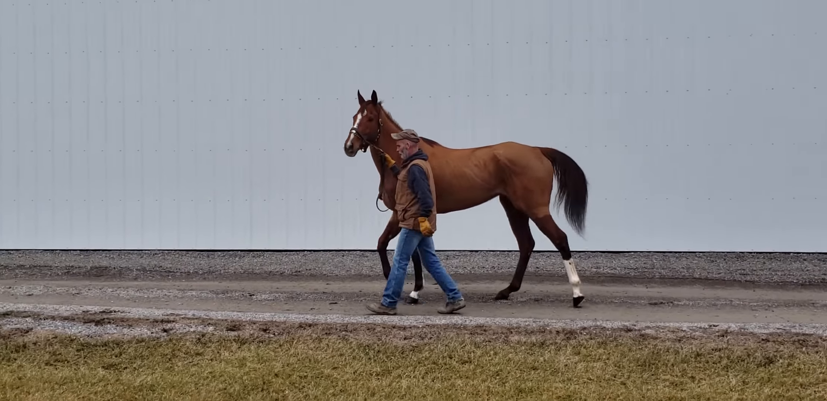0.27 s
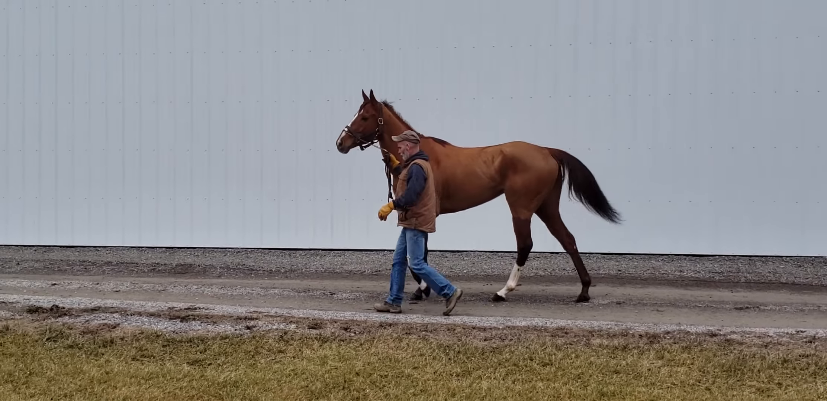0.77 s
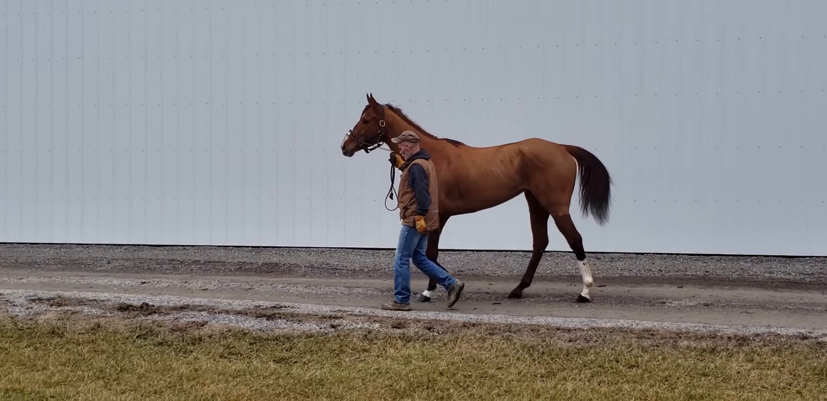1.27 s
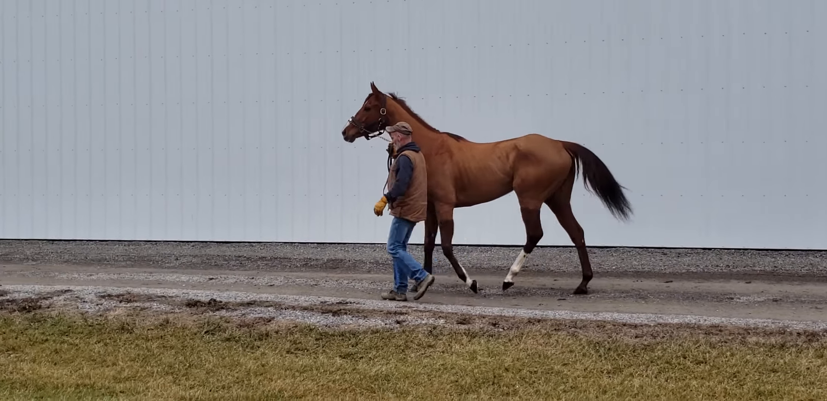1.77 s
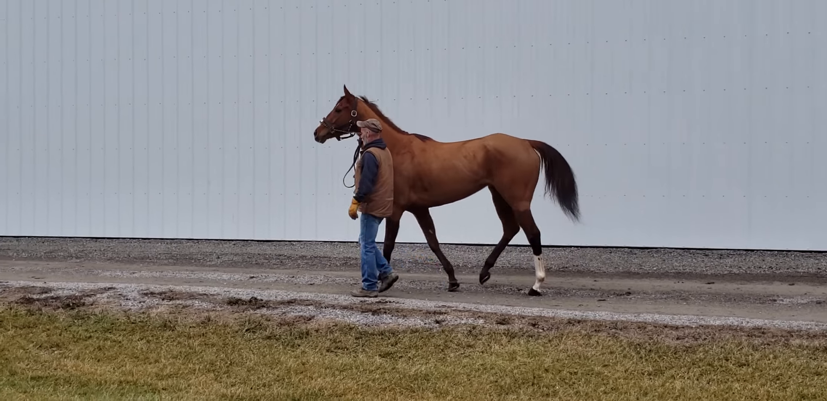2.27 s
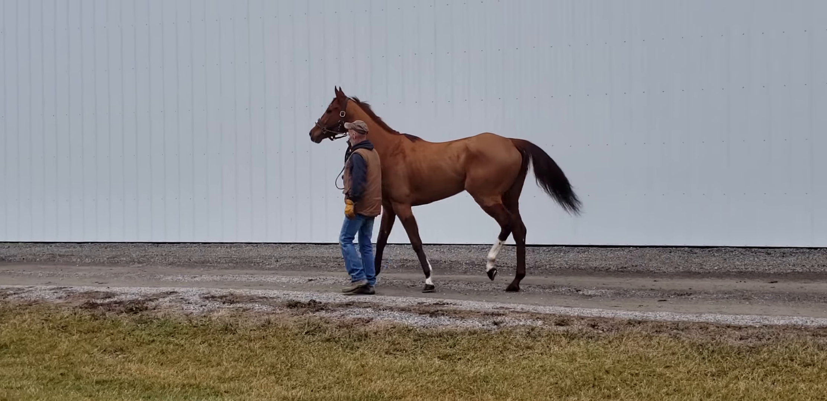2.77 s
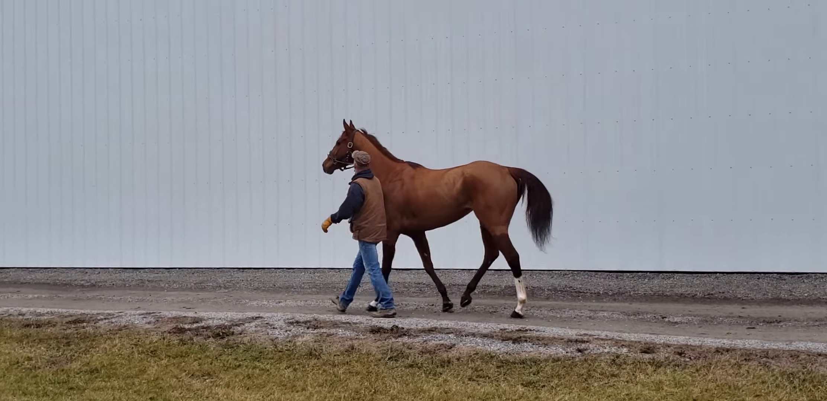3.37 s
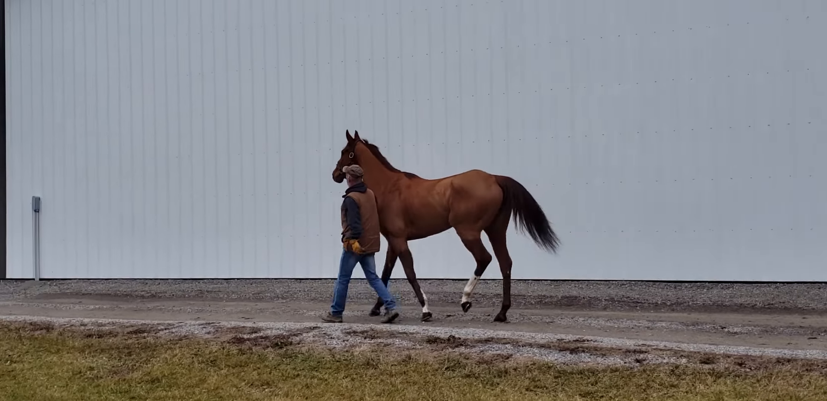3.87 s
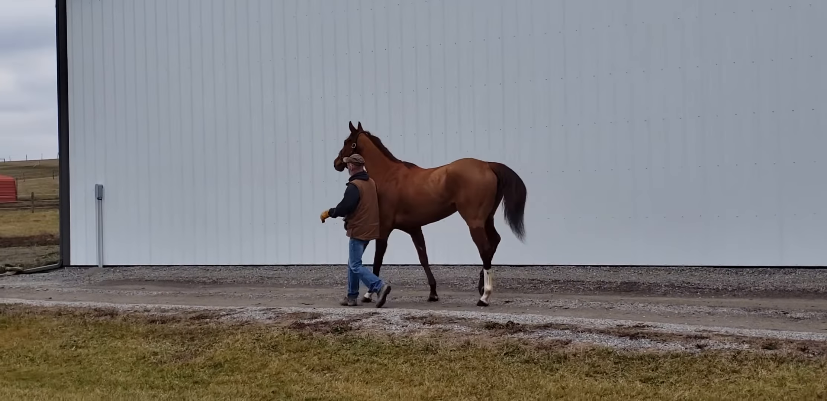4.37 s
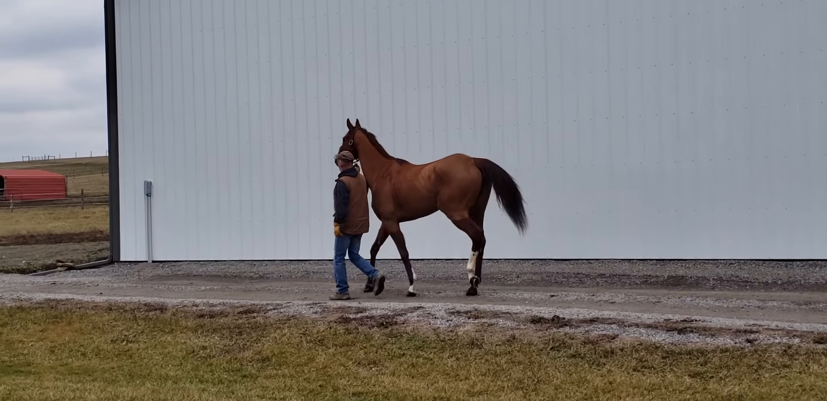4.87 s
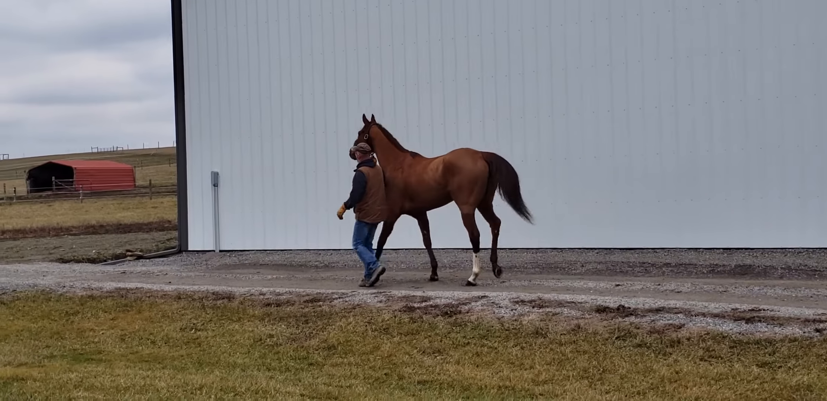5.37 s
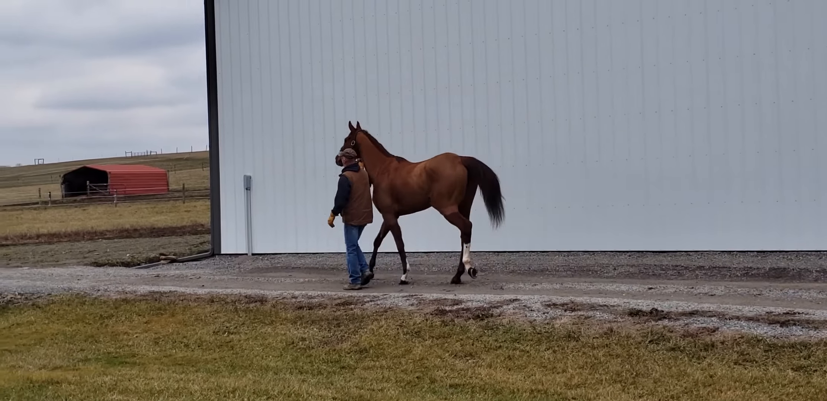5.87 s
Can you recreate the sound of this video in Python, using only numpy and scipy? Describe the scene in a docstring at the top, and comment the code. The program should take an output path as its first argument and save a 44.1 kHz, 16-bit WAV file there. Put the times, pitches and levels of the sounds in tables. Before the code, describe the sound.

Slow hoofsteps crunch and clop on loose gravel some metres away, stones clicking underfoot, with rumbling gusts over quiet open farmland.

```python
"""A horse is led at a walk along a gravel drive beside a steel barn, some metres from the microphone.
Each footfall is shaped noise, crushing grit and grinding stones; short decaying sines are stones knocked
together, and ringing bands of noise are hollow clops. The barn wall and ground answer faintly as scattered
noise. Gusts of low noise buffet mostly the left microphone port, over the low rumble of open farmland."""
import sys
import numpy as np
from scipy import signal
from scipy.fft import rfft, irfft, next_fast_len
from scipy.io import wavfile
from scipy.ndimage import uniform_filter1d, map_coordinates

SR = 44100
rng = np.random.default_rng(int(sys.argv[2]) if len(sys.argv) > 2 else 0)


def inscribe(sig):
    """Save sig as 16-bit PCM at rate SR to the path in sys.argv[1].

    A 1-D sig is mono; a 2-D sig holds one channel per row.
    Samples are clipped to [-1, 1] before scaling.
    """
    pcm = np.round(np.clip(np.atleast_2d(sig).T, -1, 1) * 32767)
    wavfile.write(sys.argv[1], SR, pcm.astype(np.int16))


N = 270774  # length in samples

# Levels in the tables are relative: each source adds its own trim.
# Footfalls, about four a second, roughly a heavy and a light one in turn.
# Each row: start in seconds, pressing time in seconds, stone level in dB, grit level in dB.
FOOTFALLS = [(0.018, 0.0047, -65, -56.5), (0.187, 0.0098, -45.5, -49), (0.536, 0.032, -55.5, -60.5),
             (0.771, 0.024, -54.5, -58.5), (1.087, 0.12, -64.5, -77), (1.286, 0.024, -52, -53.5),
             (1.599, 0.019, -58, -62.5), (1.913, 0.019, -51, -53.5), (2.21, 0.03, -56.5, -74),
             (2.444, 0.027, -51.5, -59), (2.748, 0.065, -59.5, -73.5), (3.002, 0.018, -50.5, -65),
             (3.334, 0.16, -60, -78), (3.52, 0.015, -47.5, -50.5), (3.841, 0.071, -62.5, -72),
             (4.102, 0.017, -52.5, -60.5), (4.427, 0.014, -59.5, -70.5), (4.621, 0.032, -49.5, -53.5),
             (4.879, 0.014, -56.5, -56.5), (5.179, 0.023, -52.5, -58), (5.684, 0.035, -51, -57.5),
             (5.962, 0.0045, -50.5, -49)]
# Large stones struck by a hoof.
# Each row: start in seconds, pitch in Hz, knock level in dB, level of the grit thrown off in dB.
STRUCK_STONES = [(0.0427, 1320, -38, -48.5), (0.1924, 1990, -34.5, -33.5), (0.56, 1470, -47.5, -54.5),
                 (0.841, 1160, -39.5, -49.5), (0.8562, 1240, -39, -59), (1.2506, 1660, -36.5, -76),
                 (1.6062, 1720, -45, -63), (1.7748, 930, -44, -59), (2.1378, 1880, -43.5, -79),
                 (2.3193, 1250, -42.5, -53), (2.4467, 1260, -43, -71), (2.8335, 1230, -46, -61),
                 (2.9878, 1200, -45, -67), (3.037, 1430, -41.5, -48), (3.4406, 2320, -32, -62),
                 (3.4471, 1800, -38.5, -45.5), (3.9358, 1110, -37, -53), (4.1372, 1120, -42, -68),
                 (4.5274, 2010, -36, -49), (4.575, 1300, -41.5, -47.5), (4.657, 1270, -37.5, -54),
                 (5.1984, 1310, -39, -71), (5.2168, 850, -34.5, -47), (5.247, 1940, -40.5, -49.5),
                 (5.7904, 1690, -42, -86)]
# Hollow clops of the hoof capsule.
# Each row: start in seconds, pitch in Hz, level in dB, pressing time in seconds.
HOOF_CLOPS = [(.862, 1204, -47, 0.0093), (3.034, 913, -46, 0.017), (3.532, 1146, -43, 0.0073),
              (4.648, 1204, -51, 0.022), (5.479, 1123, -53.5, 0.019), (5.698, 1140, -51, 0.027)]
# Light scuffs that roll many stones softly. Each row: start in seconds, length in seconds, level in dB.
HOOF_SCUFFS = [(0.829, 0.04, -49.5), (1.144, 0.02, -62), (1.221, 0.074, -57), (1.676, 0.087, -61.5),
               (2.011, 0.039, -57.5), (2.113, 0.041, -61.5), (2.546, 0.018, -58), (3.026, 0.06, -54.5),
               (3.943, 0.025, -62), (4.584, 0.018, -57.5), (4.987, 0.026, -55), (5.205, 0.028, -59),
               (5.543, 0.029, -57.5), (5.778, 0.021, -58), (5.992, 0.014, -57)]
# Hard chips that snap from under a hoof and ring.
# Each row: start in seconds, centre pitch of the modes in Hz, level in dB.
STONE_CHIPS = [(0.1919, 7310, -41), (0.56, 10600, -45), (1.7748, 3620, -47), (1.929, 6800, -40.5),
               (2.4472, 9720, -43.5), (3.006, 12000, -43.5), (3.036, 7200, -43.5), (3.529, 9250, -42),
               (3.542, 11300, -37.5), (4.628, 11100, -38.5), (4.8925, 4340, -35.5), (5.2913, 7300, -50.5),
               (5.6927, 9800, -39)]
# Heavy footfalls that thump the ground. Each row: start in seconds, level in dB.
GROUND_THUDS = [(0.19, -44), (0.543, -44), (1.928, -48), (3.04, -46), (3.536, -49), (3.935, -51.5),
                (4.438, -52.5), (5.213, -40.5), (5.702, -53.5)]
# Single eddies hitting the left port. Each row: centre time in seconds, pitch in Hz, level in dB.
LEFT_EDDIES = [(1.246, 85, -33), (2.097, 115, -14.5), (2.245, 149, -27.5), (2.311, 67.5, -23),
               (2.643, 88, -24.5), (3.753, 60.5, -28)]
# The breeze between gusts.
# Each row: time in seconds, level at the left port in dB, level at the right port in dB.
BREEZE_LEVELS = [(0, -65, -51), (0.7, -61, -63), (1.3, -55, -50), (1.7, -52.5, -53.5), (2.4, -41, -51),
                 (2.7, -43, -66), (2.82, -36.5, -55), (3.05, -35.5, -60), (3.35, -44.5, -63),
                 (4.05, -49.5, -65), (4.45, -62, -61), (4.85, -53.5, -62), (5.3, -73, -55),
                 (5.9, -72, -62.5), (6.14, -51, -60)]
# Gusts. Each row: start in seconds, length in seconds, left port level in dB, right port level in dB.
WIND_GUSTS = [(0.808, 0.024, -75, -37.5), (1.215, 0.033, -36, -48), (1.306, 0.024, -40.5, -50),
              (1.908, 0.062, -30, -50), (2.01, 0.11, -28.5, -63), (2.207, 0.079, -29.5, -42.5),
              (2.422, 0.16, -33.5, -69), (2.582, 0.057, -31, -69), (3.82, 0.032, -35, -63),
              (4.204, 0.11, -40, -73), (4.544, 0.015, -35, -68), (4.662, 0.067, -38, -58),
              (5.084, 0.04, -73, -42.5)]
# Background. Each row: time in seconds, distant rush level in dB, fine gravel hiss level in dB.
AIR_LEVELS = [(0, -52, -71), (.3, -54.5, -69.5), (.65, -60, -82.5), (1.4, -65.5, -84.5), (1.7, -66, -83),
              (2.1, -61.5, -76.5), (2.7, -66, -85), (4.85, -65.5, -83.5), (5.1, -63, -75),
              (5.35, -65, -75.5), (5.6, -69.5, -72), (5.9, -72.5, -85), (6.14, -78, -80)]

# Colours of the noises. Each row: frequency in Hz, relative level in dB.
GRIT_COLOUR = [(1800, -12), (2500, 5.5), (2950, -3), (3800, 4.5), (5000, -7), (6000, 0), (7500, 3),
               (8700, -10.5), (10500, -4), (11600, -2.5), (13200, -15), (16000, -11)]
PEBBLE_COLOUR = [(250, -33), (500, -21), (800, -5.5), (1200, 10), (1600, -0.5), (2100, 1), (2550, -7.5),
                 (2900, -46), (4000, -10.5), (6000, -34)]
RUSH_COLOUR = [(150, 2), (430, -12), (600, -1), (850, 5), (1000, -2), (1250, 1), (1900, -7.5), (2500, -12),
               (2900, -20), (4500, -31.5), (8000, -71)]
HISS_COLOUR = [(1500, -33), (2800, -2.5), (5000, -4.5), (7400, 1), (9000, -12), (11500, -4), (13000, -3),
               (16000, -20)]
BUFFET_COLOUR = [(15, -44), (30, -2), (50, 4.5), (85, 0), (130, -11), (200, -31.5), (300, -53.5),
                 (600, -88), (1500, -100)]
RUMBLE_COLOUR = [(20, -27), (45, 2.5), (80, 6), (140, -2), (250, -11), (450, -29), (1000, -77)]
MIC_NOISE_COLOUR = [(2000, -16), (7500, -8), (11000, 8.5), (16000, 12.5)]
THUD_COLOUR = [(30, 5), (90, 5.5), (180, 9), (350, -11.5), (700, -20), (1500, -34)]
SMALL_EDDY_COLOUR = [(60, -11.5), (170, -7.5), (260, -19.5), (400, -38), (900, -65.0), (2000, -111)]
SAND_COLOUR = [(2000, -36), (5500, -9), (7500, -11.5), (11000, -11), (14000, -12)]
# How the ports colour the hooves. Each row: frequency in Hz, left minus right in dB.
PORT_LEAN = [(200, 0), (500, -0.5), (1100, 3), (2100, 6.5), (2900, 3.5), (3800, 7), (5500, -11.5),
             (8000, 14), (10000, 17), (12000, 9), (13500, -3)]
# Fading of the answer from wall and ground. Each row: frequency in Hz, time to die by 60 dB in seconds.
YARD_DECAY = [(200, 0.24), (1200, 0.13), (4000, 0.44), (12000, 0.1)]

LOOSE_STONES, LOOSE_SPAN_S = 2, .13  # stones dislodged by a footfall, and how long they keep tipping over
LOOSE_DB, LOOSE_SPREAD_DB, LOOSE_HZ = -51, 3, 1327  # relative knock level, its scatter, middle pitch
SCUFF_GRIT_DB = -18.5  # grit stirred by a scuff, against the scuff's table level
CHIP_RING_S = 0.021  # time for a chip's modes to die by 60 dB
TRICKLE_DB, TRICKLE_FALL_S = -73, 0.91  # stray grit at each footfall, and its time to die by 60 dB
GUST_RISE_S, GUST_FALL_S = 0.014, 0.1  # build-up, and time to die by 60 dB once the length is over
TURBULENCE_DB, TURBULENCE_PER_S = 3.5, 20  # depth and speed of the breeze's flutter
LAG_START_S, LAG_END_S = .000075, .000035  # the left port's delay shrinks as the horse passes
LOW_CUT_HZ, TOP_HZ = 34, 16000
LEFT_RIGHT = np.array([[1], [-1]])


def amp(db):
    """Decibels to gain."""
    return 10 ** (np.asarray(db) / 20)


def unit(x):
    """Scale to rms 1."""
    return x / np.sqrt(np.mean(x ** 2) + 1e-20)


def along(points, hz):
    """Read (Hz, value) points on a log frequency axis."""
    f, v = np.transpose(points)
    return np.interp(np.log(hz + 1), np.log(f + 1), v)


def curves(rows):
    """One value per sample for each column after the time."""
    s, *cols = np.transpose(rows)
    return [np.interp(np.arange(N) / SR, s, c) for c in cols]


def wobble(rate):
    """A smooth random curve, rate knots a second."""
    return map_coordinates(rng.standard_normal(512), [np.arange(N) * rate / SR], mode="mirror")


def add(track, s, sound):
    """Mix a sound into a track at time s."""
    part = track[max(round(s * SR), 0):][:len(sound)]
    part += sound[:len(part)]


def filtered(x, response):
    """Filter x by a response given as a function of frequency."""
    m = next_fast_len(N + SR // 2)
    return irfft(rfft(x, m) * response(np.fft.rfftfreq(m, 1 / SR)), m)[..., :N]


def noise(spectrum):
    """Coloured noise of rms 1."""
    m = next_fast_len(N, real=True)
    colour = amp(along(spectrum, np.fft.rfftfreq(m, 1 / SR)))
    return unit(irfft(rfft(rng.standard_normal(m)) * colour, m)[:N])


def wide(spectrum, shared):
    """Stereo noise with a share of its power common to both sides."""
    shared = np.clip(shared, 0, 1)
    sides = np.array([noise(spectrum), noise(spectrum)])
    return np.sqrt(shared) * noise(spectrum) + np.sqrt(1 - shared) * sides


def stereo(spectrum, apart):
    """Rough ground scatters each grain a little differently to the two ports."""
    return unit(noise(spectrum) + apart * LEFT_RIGHT * noise(spectrum))


def tinted(x, depth_db, size=256):
    """Give a noise a colour that changes at random from moment to moment."""
    z = signal.stft(x, nperseg=size)[2]
    field = rng.standard_normal(z.shape[1:])
    field = uniform_filter1d(field, size=3, axis=0)  # smooth over frequency
    field = uniform_filter1d(field, size=5, axis=1)  # smooth over time
    return signal.istft(z * amp(depth_db * unit(field)), nperseg=size)[1][:, :N]


def evened(x, span):
    """Take slow swells out of a texture and keep its fine grain; span in seconds."""
    power = uniform_filter1d(x ** 2, max(int(span * SR), 2))
    return x / np.sqrt(np.abs(power) + 1e-6)


def grains(rate, spread_db, life):
    """Envelope of a stream of tiny collisions: many small, a few large, each dying by 60 dB in its life."""
    draw = rng.random((int(rate * N / SR), 2))
    size = amp(spread_db * np.minimum(-np.log(1 - draw[:, 1]), np.pi))
    energy = np.bincount((draw[:, 0] * N).astype(int), size ** 2, N)
    fade = amp(-60 * np.arange(SR // 50) / SR / life) ** 2
    return unit(np.sqrt(np.abs(signal.fftconvolve(energy, fade)[:N])))


def pressure(t, hold, rise, fall, settle_db, settle):
    """A foot loads the gravel, holds and lets go; loosened stones settle for longer."""
    after = np.maximum(t - hold, 0)
    release = amp(-60 * after / fall)
    settling = amp(settle_db - 60 * after / settle)
    return (1 - np.exp(-t / rise)) * np.maximum(release, settling)


def farmland():
    """A far rush and rumble, a thin hiss that comes and goes, and the microphone's steady noise."""
    rush_db, hiss_db = curves(AIR_LEVELS)
    rush = unit(tinted(wide(RUSH_COLOUR, shared=0.041), depth_db=3.0, size=1024))
    rush = amp(rush_db) * rush * amp(LEFT_RIGHT)  # 1 dB up on the left, 1 dB down on the right
    rumble = amp(rush_db + 5.0) * wide(RUMBLE_COLOUR, shared=0.98)
    hiss = amp(hiss_db) * wide(HISS_COLOUR, shared=0.077) * amp(1.2 * LEFT_RIGHT)
    return rush + rumble + hiss + amp(-79.0) * wide(MIC_NOISE_COLOUR, shared=0)


def wind():
    """Turbulence rumbles on each port; stronger flow on the left holds smaller, brighter eddies."""
    breeze_db = curves(BREEZE_LEVELS)
    ports = amp(np.array([db + TURBULENCE_DB * wobble(TURBULENCE_PER_S) for db in breeze_db]))
    t = np.arange(SR // 2) / SR
    for s, length, *levels_db in WIND_GUSTS:
        swell = np.minimum(t / GUST_RISE_S, 1) * amp(-60 * np.maximum(t - length, 0) / GUST_FALL_S)
        for port, db in zip(ports, levels_db):
            add(port, s, amp(db) * swell)
    buffets = [evened(noise(BUFFET_COLOUR), span=0.0477), evened(noise(BUFFET_COLOUR), span=0.016)]
    flow = ports * np.array(buffets)
    strength = np.clip(ports[0] / amp(-27), 0, 1) ** 2
    flow[0] += amp(-6) * ports[0] * strength * noise(SMALL_EDDY_COLOUR)
    t = np.arange(SR // 10) / SR
    for s, hz, db in LEFT_EDDIES:
        turn = 2 * np.pi * hz * (t - t.mean())
        swirl = np.sin(turn) / (1 + (turn / 2.2) ** 2) * np.hanning(len(t))
        add(flow[0], s - t.mean(), -amp(db + 5) * swirl)
    return flow


def yard(x, size=128):
    """Wall and ground scatter each band's energy into a diffuse, fading answer."""
    hz, t, z = signal.stft(x, SR, nperseg=size)
    fade = amp(-60 * t[t < .5] / along(YARD_DECAY, hz)[:, None]) ** 2
    fade = fade / fade.sum(1, keepdims=True)
    energy = signal.fftconvolve(np.abs(z) ** 2, fade[None], axes=2)[..., :len(t)]
    scatter = signal.stft(rng.standard_normal((2, N)), SR, nperseg=size)[2]
    gain = np.sqrt(np.abs(energy) / np.mean(np.abs(scatter) ** 2))
    answer = signal.istft(scatter * gain, SR, nperseg=size)[1]
    return np.pad(answer, ((0, 0), (round(.006 * SR), 0)))[:, :N]  # the answer comes 6 ms late


def trickle():
    """After each footfall stray bits of grit tick as they roll and drop."""
    t, unrest = np.arange(SR) / SR, np.zeros(N)
    for s, *_ in FOOTFALLS:
        add(unrest, s, amp(TRICKLE_DB - 60 * t / TRICKLE_FALL_S))
    ticks = grains(rate=30, spread_db=4.5, life=.006)
    return unrest * ticks * stereo(SAND_COLOUR, apart=0.67)


def thuds():
    """The weight behind a heavy footfall thumps the ground: a short burst of low noise."""
    t, weight = np.arange(SR // 5) / SR, np.zeros(N)
    for s, db in GROUND_THUDS:
        add(weight, s, amp(db) * (1 - np.exp(-t / 0.0009)) * amp(-60 * t / 0.12))
    return weight * evened(noise(THUD_COLOUR), span=0.0204)


def clops():
    """Gravel noise excites the hollow under the hoof, a single decaying resonance."""
    t, track = np.arange(SR // 5) / SR, np.zeros(N)
    for s, hz, db, hold in HOOF_CLOPS:
        hollow = np.sin(2 * np.pi * hz * t) * amp(-60 * t / 0.25)
        ring = signal.fftconvolve(rng.standard_normal(len(t)), hollow)[:len(t)]
        press = pressure(t, hold, rise=0.0032, fall=0.057, settle_db=-5.5, settle=0.11)
        add(track, s, amp(db - 2.5) * evened(ring, span=0.014) * press)
    return track


def loose_stones():
    """Each footfall dislodges a few stones that tip over soon after: rows like those of STRUCK_STONES."""
    starts = np.repeat([step[0] for step in FOOTFALLS], LOOSE_STONES)
    delay, pitch, size = rng.random((len(starts), 3)).T
    hz = LOOSE_HZ * 2 ** (pitch - .5)  # within half an octave either way
    db = LOOSE_DB + LOOSE_SPREAD_DB * (2 * size - 1)
    return list(zip(starts + LOOSE_SPAN_S * delay, hz, db, db - 11.5))


def knocks():
    """A struck stone gives a dead knock of a few cycles; chips spray off, each with its own brief ring."""
    t, knock, rattle, spray = np.arange(SR // 20) / SR, np.zeros(N), np.zeros(N), np.zeros(N)
    thump = (1 - np.exp(-t / 0.00064)) * amp(-60 * t / 0.0087)
    clatter = (1 - np.exp(-t / 0.00048)) * amp(-60 * t / 0.035)
    snap = (1 - np.exp(-t / 0.0013)) * amp(-60 * t / 0.025)
    for s, hz, db, grit_db in list(STRUCK_STONES) + loose_stones():
        add(knock, s, amp(db + 6.5) * np.sin(2 * np.pi * hz * t) * thump)
        add(rattle, s, amp(db - 8.5) * clatter)
        add(spray, s, amp(grit_db + 1.0) * snap)
    chip_fade = (1 - np.exp(-t / 0.00022)) * amp(-60 * t / CHIP_RING_S)
    for s, hz, db in STONE_CHIPS:
        # an irregular chip has several close modes
        modes_hz = hz * np.exp(.11 * rng.standard_normal((6, 1)))
        ring = np.sin(2 * np.pi * (modes_hz * t + rng.random(modes_hz.shape))).mean(0)
        add(knock, s, amp(db + 9.5) * chip_fade * ring)
        add(spray, s, amp(db - 3.0) * snap)
    pebbles = evened(stereo(PEBBLE_COLOUR, apart=0.49), span=0.0049)
    grit = evened(stereo(GRIT_COLOUR, apart=0.64), span=0.0036)
    return knock + rattle * pebbles + spray * grit


def crunch():
    """Under each foot coarse stones grind and fine grit crackles; a scuff rolls many stones at once, softly."""
    t, coarse, fine, rolled = np.arange(SR // 2) / SR, np.zeros(N), np.zeros(N), np.zeros(N)
    for s, hold, stone_db, grit_db in FOOTFALLS:
        grind = pressure(t, hold, rise=0.0015, fall=0.17, settle_db=-10.0, settle=0.43)
        crackle = pressure(t, hold, rise=0.00084, fall=0.079, settle_db=-14.5, settle=0.47)
        add(coarse, s, amp(stone_db) * grind)
        add(fine, s, amp(grit_db) * crackle)
    for s, length, db in HOOF_SCUFFS:
        push = amp(db) * pressure(t, length, rise=0.005, fall=0.085, settle_db=-8.5, settle=0.33)
        add(rolled, s, push)
        add(fine, s, amp(SCUFF_GRIT_DB) * push)
    collisions = grains(rate=520, spread_db=5, life=.01)
    cracks = grains(rate=700, spread_db=5, life=.008)
    rolls = grains(rate=900, spread_db=4, life=.01)
    pebbles = tinted(stereo(PEBBLE_COLOUR, apart=0.44), depth_db=0.5)
    grit = cracks * tinted(stereo(GRIT_COLOUR, apart=1.0), depth_db=2.0)
    grinding = amp(-2.04) * coarse * evened(collisions * pebbles, span=0.02)
    rolling = amp(-3.0) * rolled * evened(rolls * pebbles, span=0.014)
    crackling = amp(0.7) * fine * evened(grit, span=0.023)
    return grinding + rolling + crackling


def scene():
    """The two ports colour the hooves differently, and the left one hears them slightly later."""
    horse = crunch() + knocks() + clops() + thuds() + trickle()
    with_yard = horse + amp(-11.0) * yard(horse)
    placed = filtered(with_yard, lambda hz: amp(LEFT_RIGHT * along(PORT_LEAN, hz) / 2))
    lag = np.linspace(LAG_START_S, LAG_END_S, N) * SR  # in samples, split between the ports
    heard_at = np.arange(N) - LEFT_RIGHT * lag / 2
    placed = np.array([map_coordinates(port, [at], order=5) for port, at in zip(placed, heard_at)])
    return placed + wind() + farmland()


def record(dry):
    """A low cut thins the deepest wind, and nothing passes above the band limit."""
    return filtered(dry, lambda hz: (hz < TOP_HZ) * hz ** 2 / np.hypot(hz ** 2, LOW_CUT_HZ ** 2))


dry = scene()
out = record(dry)
inscribe(out)
```